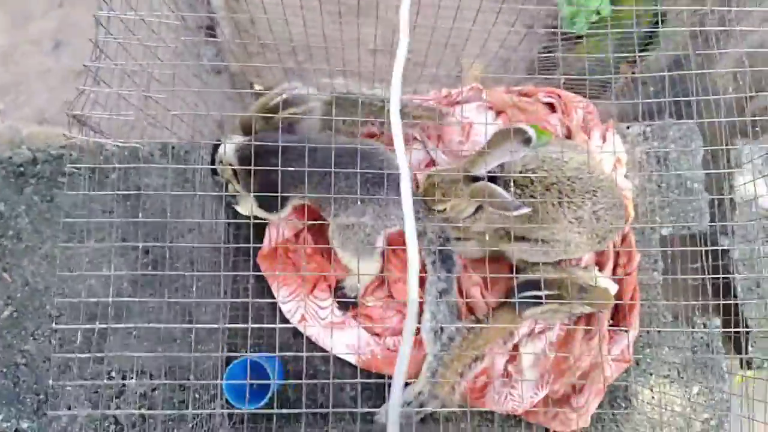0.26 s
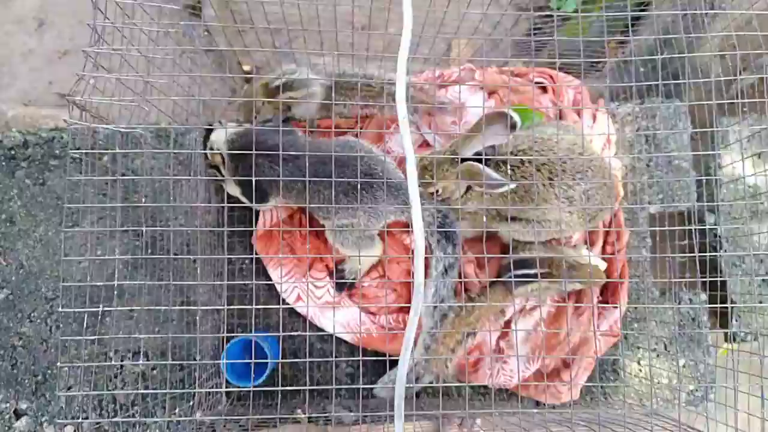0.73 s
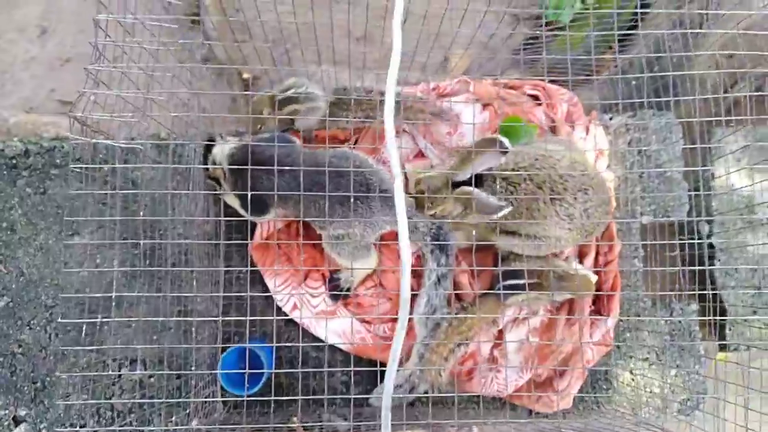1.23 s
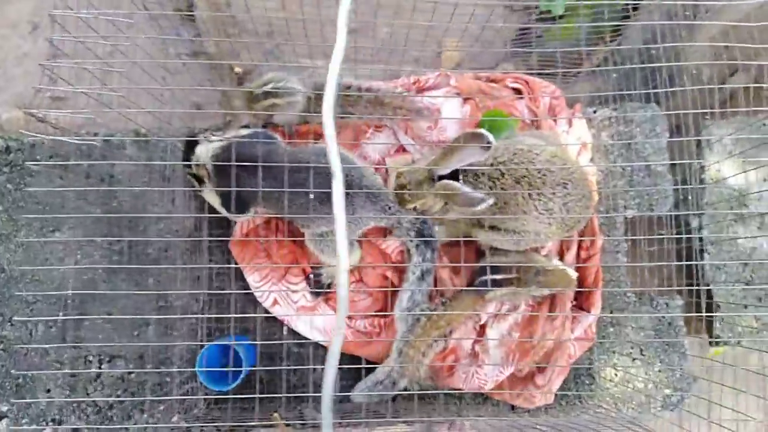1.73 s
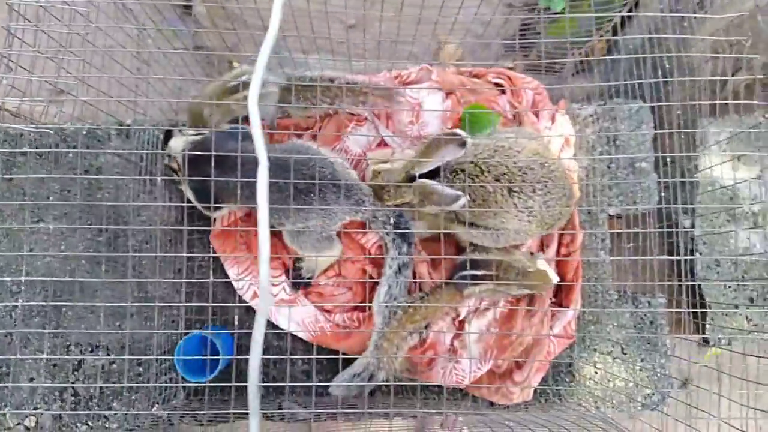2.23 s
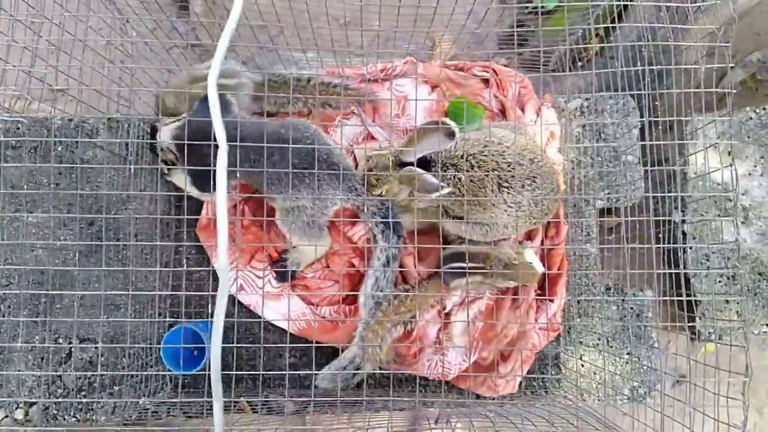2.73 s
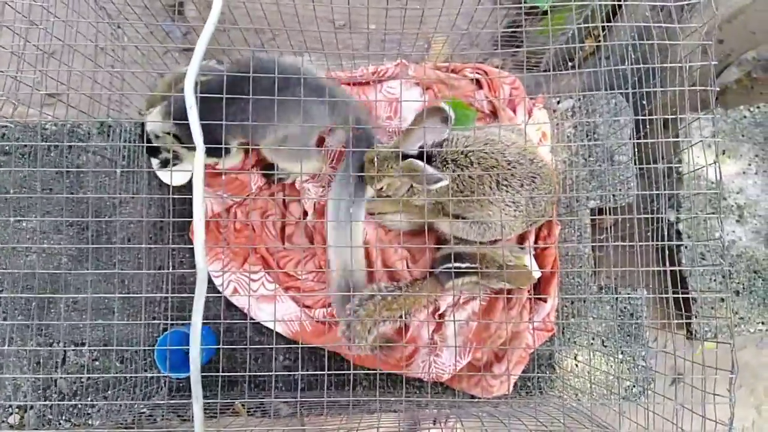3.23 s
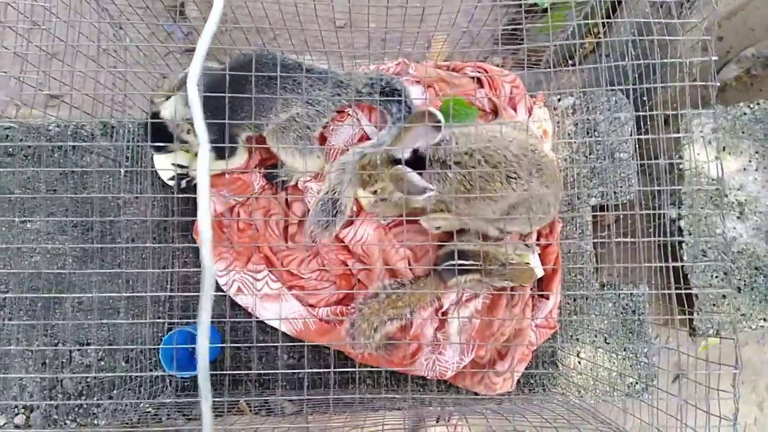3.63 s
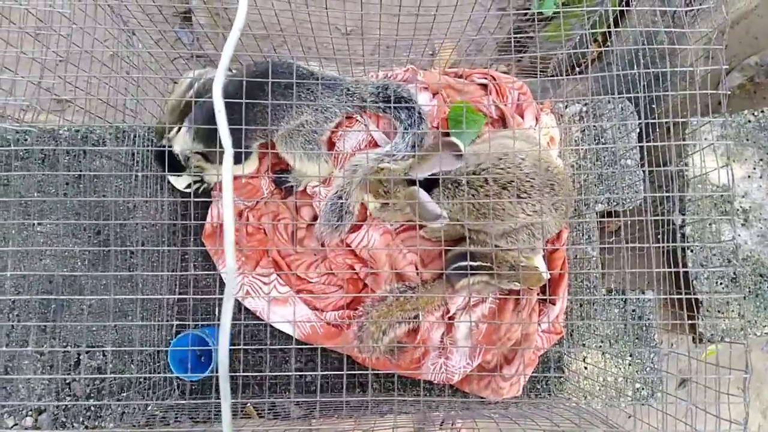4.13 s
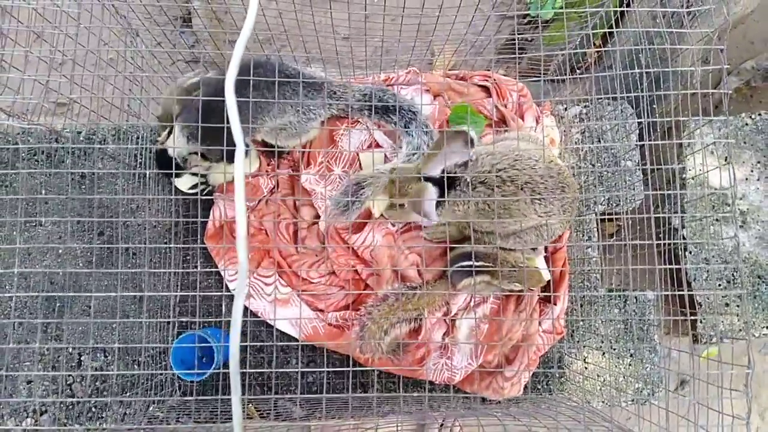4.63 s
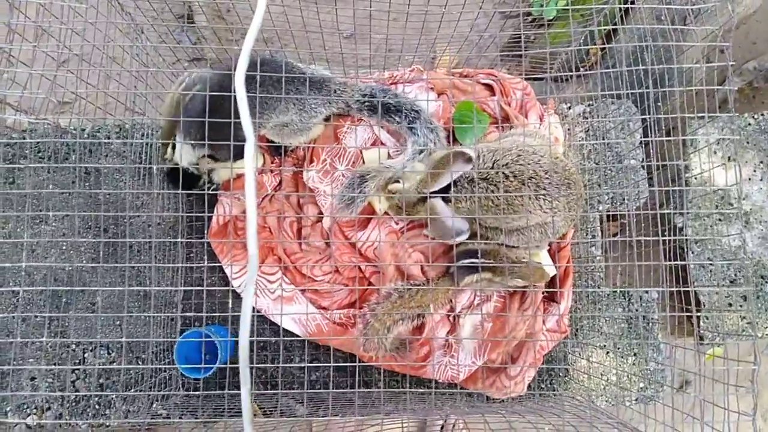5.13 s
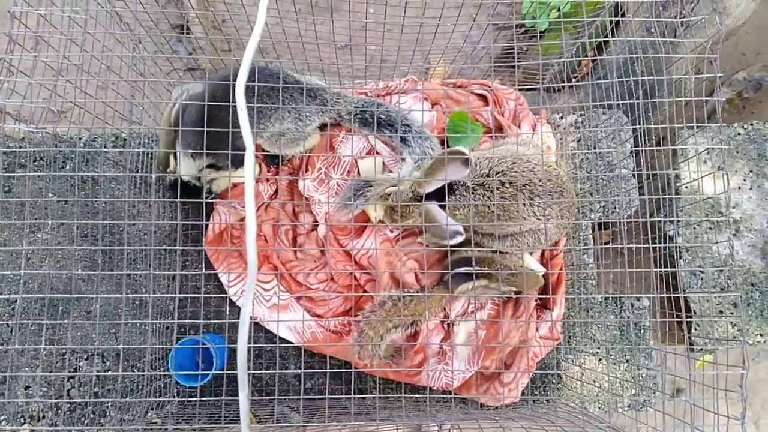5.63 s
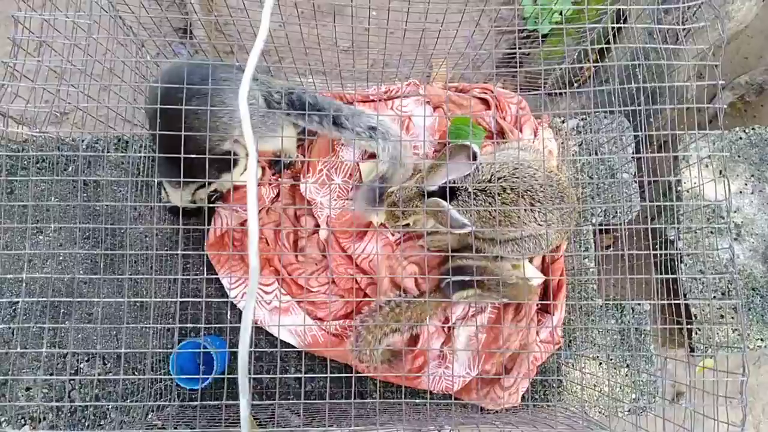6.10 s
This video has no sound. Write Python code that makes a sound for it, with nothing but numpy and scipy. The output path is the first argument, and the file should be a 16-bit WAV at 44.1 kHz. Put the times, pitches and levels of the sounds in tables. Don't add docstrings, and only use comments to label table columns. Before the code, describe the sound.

In a quiet yard by day, a hand taps and rubs the microphone case with low hollow thuds and a swish. A nearby bird then gives a rapid buzzy whistle phrase around one second. Claws tick sparsely on a wire hutch, a dove purrs low in the middle, and thin bird chips follow. Insects drone faintly over deep distant traffic. A bright burst of claw scratching on mesh closes it. Close, stereo, noise-reduced pickup.

```python
import sys
import numpy as np
from scipy import signal
from scipy.fft import rfft, irfft, next_fast_len
from scipy.io import wavfile
from scipy.ndimage import uniform_filter1d, map_coordinates

SR = 44100
rng = np.random.default_rng(int(sys.argv[2]) if len(sys.argv) > 2 else 0)


def put_to_file(sound):
    columns = np.atleast_2d(sound).T
    safe = np.clip(columns, -1, 1)
    whole_steps = np.round(safe * 32767)
    wavfile.write(sys.argv[1], SR, whole_steps.astype(np.int16))


def ratio(d):
    e = np.asarray(d, float) / 20
    return 10 ** e


N = 280476


def rms_one(x):
    return x / np.sqrt(np.mean(x ** 2) + 1e-20)


def in_time(rows):
    return np.interp(np.arange(N) / SR, *np.transpose(rows))


def at_hz(points, hz):
    points = np.array(points)
    return np.interp(np.log(hz + 1), np.log(points[:, 0]), points[:, 1])


def soft(db):
    return uniform_filter1d(ratio(db), size=130)


def sides(pan_db):
    left = ratio(np.asarray(pan_db) + np.zeros(N))
    return 2 * np.array([left, np.ones(N)]) / np.sqrt(1 + left ** 2)


def drift(rate):
    r = np.exp(-40 * np.pi * rate / SR)
    slow = signal.lfilter([1], [1, -2 * r, r * r], rng.standard_normal(N // 20 + 2002))[2000:]
    return np.interp(np.arange(N) / 20, np.arange(len(slow)), rms_one(slow))


def band(x, low_hz, high_hz, order=2):
    return signal.sosfilt(signal.butter(order, [low_hz, high_hz], "band", fs=SR, output="sos"), x)


def coloured(spectrum, patchy_db, alike=0., grain_db=0., patch_hz=460, frames=12):
    grain = grain_db * np.minimum(rng.exponential(1, N), 4)
    a, b = rng.standard_normal((2, N)) * ratio(grain)
    pair = np.array([a, alike * a + np.sqrt(1 - alike ** 2) * b], np.float32)
    hz, t, cells = signal.stft(pair, SR, nperseg=512)
    first, second = rng.standard_normal((2, 200, len(t) // 4 + 2))
    where = np.meshgrid(hz / patch_hz, np.arange(len(t)) / frames, indexing="ij")
    knots = (first, alike * first + (1 - alike) * second)
    patches = np.array([map_coordinates(k, where, order=1) for k in knots])
    cells = cells * ratio(patchy_db * patches).astype(np.float32)
    pair = signal.istft(cells, SR, nperseg=512)[1][:, :N]
    size = next_fast_len(N)
    colour = ratio(at_hz(spectrum, np.arange(size // 2 + 1) * SR / size))
    return rms_one(irfft(rfft(pair, size) * colour, size)[:, :N])


def swells(rows, rise, fall):
    t, rows = np.arange(0, N, 16) / SR, np.array(rows, float)
    since = t - rows[:, :1]
    db = rows[:, 2:3] + rise * np.minimum(since, 0) - fall * np.maximum(since - rows[:, 1:2], 0)
    row = rows[db.argmax(axis=0)].T
    progress = np.clip((t - row[0]) / row[1], 0, 1)
    db, u, *row = np.repeat([db.max(axis=0), progress, *row], 16, axis=1)[:, :N]
    return db, u, row


def ring(peak_db, hz, t60, puff, rise_s=0.):
    noise = band(rng.standard_normal(500 + round(t60 * SR)), hz * .72, hz * 1.35)
    noise = rms_one(noise[500:])
    t = np.arange(len(noise)) / SR
    rise = 1 - np.exp(-t / (rise_s + .5 / hz))
    tone = np.sin(2 * np.pi * hz * t)
    return ratio(peak_db - 60 * t / t60) * rise * ((1 - puff) * tone + puff * noise)


def add(out, s, sound, pan_db, lag=11):
    for side, gain, late in ((0, ratio(pan_db), lag), (1, 0.98, 0)):
        i = round(s * SR) + int(late)
        out[side, i:i + len(sound)] += 2 * gain / (1 + ratio(pan_db)) * sound[:N - i]


YARD_T60_S, YARD_DB = 0.66, -12.5


def yard(x):
    t = np.arange(round(YARD_T60_S * SR)) / SR
    tail = band(rng.standard_normal((2, SR)), 330, 11000, order=1)[:, :len(t)]
    tail = tail * ratio(-60 * t / YARD_T60_S) * (t > .012)
    return signal.fftconvolve(x, tail / np.sqrt(np.sum(tail ** 2) / 2), axes=1)[:, :N]


# (pitch [Hz], level [dB per Hz])
RUMBLE = [(20, -36), (32, -36), (45, -31), (56, -15), (64, 0), (73, -6), (100, -7), (125, -9), (150, -21),
          (190, -34), (260, -50), (400, -90)]
# (time [s], level [dB])
TRAFFIC = [(0.0, -45.5), (1.54, -47), (2.53, -51.5), (4.14, -46.5), (4.3, -50), (6.27, -48), (6.36, -56)]


def traffic():
    rumble = coloured(RUMBLE, 2.5, alike=0.93)
    return ratio(in_time(TRAFFIC)) * rumble * sides(np.linspace(.3, -4, N)) / np.sqrt(2)


# (pitch [Hz], level [dB per band line])
NOISE_PRINT = [(100, -90), (200, -84), (400, -88), (1000, -92), (2500, -91), (3500, -85), (5500, -79),
               (6300, -82), (7000, -86), (8000, -88), (9500, -92), (10500, -91), (12000, -95), (14500, -99)]


def murmur():
    return ratio(-64.5) * coloured(NOISE_PRINT, 5, patch_hz=200, frames=10)


# (low [Hz], high [Hz], left-right at start [dB], left-right at end [dB], flicker [dB])
CHORUS = [
    (3600, 4900, 6.5, 9.5, 4),
    (4520, 5800, 9.5, 9, -1.5),
    (6616, 7180, 4, -6.5, 3.5),
    (9086, 9650, 7.5, 21.5, 5.5),
    (7810, 8600, 6.5, -9.5, 6.5),
]
# (rise [dB/s], fall [dB/s])
SWELL = [(22.6, 20), (101, 60), (30, 2), (60, 91), (402, 408.5)]
# (time at full voice [s], hold [s], level [dB])
DRUMMER = [(0.755, 2.13, -63.5), (3.999, 1.5, -69), (5.596, 0.077, -63.5), (6.055, .4, -59)]
CICADA = [(.36, .68, -53), (1.15, .45, -57.5), (1.65, .32, -54), (2.581, 1.02, -55.5), (3.75, .28, -60.5),
          (4.46, .26, -55), (5.1, .15, -60), (5.28, .42, -53), (5.8, .12, -62.5), (6.15, .2, -60)]
CRICKET = [(0.01, 0.309, -56.5)]
KATYDID = [(.12, 0.5, -68), (1.08, 0.16, -67), (1.5, 0.37, -75), (2.0, 0.55, -80.5), (2.499, 0.83, -76),
           (3.4, 0.29, -69), (3.85, .5, -88), (4.499, 0.35, -70), (5.1, 0.25, -79), (5.5, 0.84, -86.5),
           (6.201, 0.27, -73)]
HOPPER = [(.93, 0.12, -74), (1.28, 0.063, -77), (1.841, 0.023, -82), (2.279, 0.1, -75), (2.52, 0.035, -86),
          (2.73, 0.033, -85), (3.08, 0.042, -76), (4.051, 0.05, -81), (4.39, .04, -81), (5.63, 0.035, -74)]


def insects():
    out, clicks = 0, coloured([(100, 0), (20000, 0)], 2.5, grain_db=1.5)
    phrases = (DRUMMER, CICADA, CRICKET, KATYDID, HOPPER)
    for rows, rates, chorus in zip(phrases, SWELL, CHORUS):
        low_hz, high_hz, start_db, end_db, flicker_db = chorus
        db = swells(rows, *rates)[0]
        song = rms_one(band(clicks, low_hz, high_hz, order=5 if low_hz > 4000 else 2))
        flicker = ratio(flicker_db * np.array([drift(13.4), drift(30)]))
        out = out + ratio(db) * song * flicker * sides(np.linspace(start_db, end_db, N))
    return out


# (time [s], hold [s], level [dB], top [Hz], end [Hz])
DOVE = [
    (1.12, 0.49, -75, 690, 664),
    (1.72, 0.22, -69.5, 833, 824),
    (1.92, 0.12, -65.5, 644, 620),
    (2.1, 0.16, -77.5, 860, 855),
    (2.39, .9, -61, 674, 634),
    (3.54, 0.62, -59, 723.4, 630.6),
    (5.72, 0.46, -77, 700, 620),
]
PURR_PER_S = 70.5
COO_DB_PER_S, COO_ARCH_DB = 297.5, 5
SCOOP_S, SCOOP_SHARE = 0.055, .12


def doves():
    db, u, (_, hold, _, top_hz, end_hz) = swells(DOVE, COO_DB_PER_S, COO_DB_PER_S)
    db = db - COO_ARCH_DB * (2 * u - 1) ** 2
    scoop = 1 - SCOOP_SHARE * np.exp(-u * hold / SCOOP_S)
    throat_hz = (top_hz + u * (end_hz - top_hz)) * scoop
    throb = np.exp(np.cos(2 * np.pi * np.cumsum(PURR_PER_S * (1 + .03 * drift(3))) / SR))
    rough = signal.sosfilt(signal.butter(4, 62, fs=SR, output="sos"), rng.standard_normal((2, N)))
    turn = 2 * np.pi * np.cumsum(throat_hz) / SR
    voice = (0.75 + rms_one(rough[0])) * np.cos(turn) + rms_one(rough[1]) * np.sin(turn)
    dry = soft(db) * rms_one(voice * (2.2 + throb)) * np.ones((2, 1))
    return dry + ratio(-12) * yard(dry)


NOTE_RISE_DB_PER_S, NOTE_FALL_DB_PER_S = 3497, 1796.5
STEADY_PER_GLIDE = 1
GLIDE_BEND = 0.55
RASP, RASP_HZ, OCTAVE = 0.18, 834, 0.041


def whistles(notes, steady, wobble, cycles, rise=NOTE_RISE_DB_PER_S, rasp=RASP):
    db, u, (s, _, _, start_hz, end_hz) = swells(notes, rise, NOTE_FALL_DB_PER_S)
    beat = np.pi * np.cumsum((start_hz + end_hz) / cycles * (1 + wobble * drift(33))) / SR
    beat = beat - beat[(s * SR).astype(int)]
    steady = steady + STEADY_PER_GLIDE * np.abs(end_hz / start_hz - 1)
    buzz = (steady + np.cos(beat)) / np.sqrt(steady ** 2 + .5)
    bend = 1 + wobble * np.sin(beat) + 0.33 * wobble * drift(140)
    glide_hz = start_hz + u ** GLIDE_BEND * (end_hz - start_hz)
    turn = 2 * np.pi * np.cumsum(glide_hz * bend) / SR
    breath = 1 + rasp * rms_one(band(rng.standard_normal(N), 60, RASP_HZ))
    tone = (np.sin(turn) + OCTAVE * np.sin(2 * turn)) * breath
    return uniform_filter1d(ratio(db + 8.0), size=90) * buzz * tone


# (time [s], length [s], start [Hz], end [Hz], peak [dB])
CHIP = [
    (3.74, 0.0035, 4346, 2830, -41),
    (4.393, 0.017, 5310, 4520, -45),
    (4.491, 0.028, 4856, 5820, -34),
    (4.507, 0.025, 5620, 4360, -38),
    (5.31, 0.0053, 3990, 3420, -48.5),
    (5.401, 0.015, 4960, 3180, -38),
]


def chips():
    out = np.zeros((2, N))
    for s, length, start_hz, end_hz, peak_db in CHIP:
        u = np.linspace(0, 1, round(length * SR))
        turn = 2 * np.pi * np.cumsum(start_hz + u ** 0.725 * (end_hz - start_hz)) / SR
        tone = np.sin(turn) + 0.066 * np.sin(2 * turn)
        add(out, s, ratio(peak_db) * np.sin(np.pi * u) ** 0.81 * tone, 1.5)
    return out


# (time [s], hold [s], level [dB], start [Hz], end [Hz])
WHISTLE = [
    (1.1385, 0.011, -34, 2680, 2660),
    (1.149, 0.0037, -34.5, 2736, 2620),
    (1.172, 0.014, -52, 2504, 2700),
    (3.388, 0.015, -64, 2590, 2530),
    (3.428, 0.032, -64.5, 2390, 2305),
]
GLIDE = [
    (1.064, 0.0098, -44.5, 2178, 1860),
    (1.089, 0.0045, -42.5, 1960, 1934),
    (1.097, 0.025, -44.5, 2430, 3040),
]
TRILL = [
    (.7975, .017, -37.5, 2854, 2724),
    (.832, .018, -47.5, 2690, 3000),
]
UPPER = [
    (.984, 0.0074, -56.5, 1960, 2077),
    (.997, 0.024, -46, 2150, 2135),
    (1.03, 0.046, -57.5, 2150, 2143),
]
LOWER = [
    (.997, .028, -49, 1910, 1915),
    (1.027, 0.023, -53.5, 1814, 1762),
]
STEADY, SPLIT_STEADY = 1.2, 28.7
CYCLES_PER_BUZZ, QUICK_CYCLES_PER_BUZZ, TRILL_RISE_DB_PER_S = 16, 10, 1047


def birds():
    out = chips()
    buzzy = whistles(WHISTLE, STEADY, 0.04, CYCLES_PER_BUZZ)
    buzzy += whistles(GLIDE, 1.6 * STEADY, .012, QUICK_CYCLES_PER_BUZZ)
    buzzy += whistles(TRILL, STEADY, 0.018, QUICK_CYCLES_PER_BUZZ, TRILL_RISE_DB_PER_S)
    split = sum(whistles(voice, SPLIT_STEADY, 0.0022, CYCLES_PER_BUZZ, rasp=0.04) for voice in (UPPER, LOWER))
    add(out, 0, buzzy + split, 11)
    return out + ratio(YARD_DB) * yard(out)


# (time [s], hold [s], dull level [dB], bright level [dB])
STIR = [(2.58, 0.085, -69.5, -92), (3.35, 0.013, -100, -74), (3.53, 0.016, -72, -79.5),
        (4.667, 0.064, -81, -80), (5.759, 0.059, -74, -75), (5.976, .03, -86, -73), (6.08, 0.029, -98, -56),
        (6.184, 0.035, -86, -59.5), (6.26, 0.0082, -82, -57), (6.314, 0.014, -93, -50.5)]
# (time [s], hold [s], level [dB])
BURST = [
    (6.07, 0.074, -58.5),
    (6.15, .08, -60.5),
    (6.31, 0.021, -48.5),
]
# (pitch [Hz], level [dB per Hz])
STIR_DULL = [(500, -52), (850, 6), (1020, 4), (1500, 5), (2200, 0), (3000, -35), (5000, -77)]
STIR_BRIGHT = [(3240, -31.5), (5500, -3.5), (8860, -4), (9960, -53), (10100, -33), (10800, -20),
               (11900, -23.5), (14400, -41.5)]
SCRAMBLE = [(650, -75), (1100, -32), (1300, -16), (1500, -8), (2050, -9), (2500, 13), (6500, 3.5),
            (8450, -51), (14300, -120)]
STIR_DB_PER_S = 184
BURST_RISE_DB_PER_S, BURST_FALL_DB_PER_S = 127, 188


def paws():
    dull = swells([r[:3] for r in STIR], 2.3 * STIR_DB_PER_S, STIR_DB_PER_S)[0]
    bright = swells([(s, hold, db) for s, hold, _, db in STIR], STIR_DB_PER_S, STIR_DB_PER_S)[0]
    scramble = swells(BURST, BURST_RISE_DB_PER_S, BURST_FALL_DB_PER_S)[0]
    out = soft(dull + .8) * coloured(STIR_DULL, 6, grain_db=2, patch_hz=160, frames=8) * sides(6)
    out += soft(bright + 4) * coloured(STIR_BRIGHT, 3.5, grain_db=3) * sides(-3)
    out += soft(scramble + 4) * coloured(SCRAMBLE, 1.8, grain_db=3.0) * sides(9.6)
    return out


# (time [s], hold [s], level [dB])
RUB = [
    (.31, 0.18, -52.5),
    (0.0081, .2, -73),
    (1.686, 0.22, -70.5),
]
# (time [s], hold [s], level [dB])
SWISH = [
    (0.0081, .2, -67),
    (.25, 0.055, -61.5),
    (.36, 0.12, -49.5),
    (.52, 0.17, -57.5),
]
# (pitch [Hz], level [dB per Hz])
RUB_DULL = [(40, -25.5), (82, 9), (140, -4), (205, 5), (482, -8), (634, -10.5), (776, -7), (1370, -26.5),
            (2400, -33), (3120, -56), (5280, -120)]
RUB_BRIGHT = [(1290, -19.5), (2200, -16.5), (2840, -11.5), (4020, -13), (5780, -4), (7040, -3.5),
              (9550, -16), (11500, -27), (12500, -41), (16200, -52), (22000, -120)]
RUB_RISE_DB_PER_S, DULL_FALL_DB_PER_S, BRIGHT_FALL_DB_PER_S = 79, 28.5, 190.5


def rubbing_hand():
    dull = swells(RUB, RUB_RISE_DB_PER_S, DULL_FALL_DB_PER_S)[0]
    bright = swells(SWISH, RUB_RISE_DB_PER_S, BRIGHT_FALL_DB_PER_S)[0]
    out = soft(dull + 3) * coloured(RUB_DULL, 2.5, grain_db=1.5) * sides(11)
    out += soft(bright + 7) * coloured(RUB_BRIGHT, 2.6, grain_db=2.0) * sides(23.0)
    return out


# (time [s], peak [dB], ring [Hz], left-right [dB])
TAP = [(4.6884, -59, 1050, 5), (4.7134, -59.5, 1270, 22), (4.838, -58.5, 540, 8), (4.854, -61, 1070, 12),
       (6, -59, 586, 16), (5.31, -57, 576, 14), (5.096, -70.5, 1050, 8), (4.43, -66, 450, 7),
       (2.7, -62, 420, 5), (2.1, -57, 410, 3), (2.3, -58.5, 350, 2.5), (5.18, -60, 430, 9),
       (5.93, -62.5, 900, 6), (6.324, -31.5, 7200, 7)]


def taps(out):
    for s, db, hz, pan_db in TAP:
        add(out, s, ring(db, hz, 0.091, puff=0.11, rise_s=0.0012), pan_db)


# (time [s], peak [dB], centre
# [Hz], left-right [dB])
SNAP = [(0.814, -39, 4300, 10.5), (1.141, -34, 3050, 8.5), (1.16, -42.5, 3200, 5.5), (.856, -51, 3400, 7.5),
        (.876, -48, 3200, 15), (1.144, -50.5, 3070, 9.5), (1.15, -42, 2990, 8.5), (3.484, -41, 1300, 4),
        (6.328, -33, 6500, -6), (3.4865, -44, 8800, 5), (3.4924, -31.5, 8800, -5), (3.483, -43.5, 900, 3),
        (3.4915, -41, 4200, 5), (3.494, -33, 6600, 15), (3.5, -40, 8800, 0), (3.507, -46, 6500, -9),
        (4.599, -41, 6000, 4), (4.598, -52, 9000, 1), (4.6994, -42, 5200, 7), (4.87, -53, 9500, -0.5),
        (0.824, -45.5, 4450, 14.5), (2.0665, -48.5, 6660, 0), (4.221, -57.5, 1370, -4),
        (4.299, -60.5, 2270, -24), (5.0933, -63, 1710, -8), (5.7976, -44.5, 6800, 1),
        (5.996, -44, 6900, -8), (6.0237, -43, 6000, -4)]


def snaps(out, rows=SNAP):
    for s, db, hz, pan_db in rows:
        add(out, s, ring(db, hz, .018, puff=1), pan_db)


# (time [s], peak [dB], ring
# [Hz], left-right [dB])
TICK = [(1.3243, -36, 3540, -3), (1.7837, -35, 3720, 4), (1.8482, -37.5, 3650, 2),
        (2.0901, -33.5, 4340, -7), (2.29, -36.5, 3434, 2), (2.4843, -42.5, 4030, -4), (2.701, -38, 4160, 9),
        (2.772, -49.5, 4100, -13), (2.904, -41.5, 4290, 2), (3.483, -32, 3710, 8), (4.2967, -43, 4140, -1),
        (4.698, -36.5, 3730, 3), (5.1505, -37.5, 3600, 0), (5.157, -48.5, 3470, 11),
        (5.7994, -41.5, 4230, 17), (6.0263, -56, 4170, 10), (6.0462, -47, 3870, 1), (6.0712, -34, 3530, 6),
        (6.0868, -21.5, 3900, 5), (6.091, -33, 4300, 10), (6.095, -31, 3500, 6), (6.102, -33, 3270, 1),
        (6.3195, -25, 3300, 15), (6.325, -30, 3700, 9), (6.2892, -31, 3340, 7), (6.329, -19, 3500, 17.5)]
# (time [s], peak [dB], ring [Hz], left-right [dB])
SCRATCH = [(2.5565, -38.5, 4180, 3), (3.3388, -42, 4050, 1), (3.4892, -29, 3800, -18),
           (3.4983, -29.5, 3600, 31), (4.596, -47, 4050, -9), (4.936, -41.5, 3600, 4),
           (5.094, -39, 4050, 0), (5.9925, -61, 2610, 14), (6.0779, -29, 3170, 3), (6.303, -30, 3400, -5)]
TICK_TREBLE_DB, SCRATCH_TREBLE_DB = -25.5, -17


def claws(out):
    rows = [(*r, TICK_TREBLE_DB) for r in TICK] + [(*r, SCRATCH_TREBLE_DB) for r in SCRATCH]
    for s, db, hz, pan_db, treble_db in rows:
        t60, rise_s = (.04, .003) if db < -36 else (.022, .0002)
        add(out, s - .001, ring(db - 1.5, hz, t60, puff=0.44, rise_s=rise_s), pan_db)
        add(out, s, ring(db + treble_db, 8500, .05, puff=1, rise_s=.001), pan_db - 2)
        add(out, s, ring(min(db, -36) - 13, 4800, .12, puff=1, rise_s=.003), pan_db - 6)


# (time [s], peak [dB], ring [Hz], left-right [dB])
KNOCK = [(0.689, -30, 163, 31), (0.789, -32, 151, 24), (1.295, -31.5, 217, 18), (1.684, -31, 141, 23),
         (1.912, -28.5, 134, 22), (3.483, -30.5, 640, 5), (3.4876, -31, 470, -1), (4.103, -38, 165, 25),
         (5.399, -46, 170, 16), (5.421, -50, 202, 4)]


def knocks(out, rows=KNOCK):
    for s, db, hz, pan_db in rows:
        add(out, s, ring(db, hz, 0.027, puff=0.51), pan_db)
        add(out, s, ring(db - 11.5, hz * 1.82, 0.051, puff=0.48), pan_db)


# (time [s], peak [dB], ring [Hz])
FINGER = [
    (.097, -21.5, 137),
    (0.118, -31, 177),
    (0.18, -20, 160),
    (0.2406, -19.5, 169),
    (.292, -27.5, 197),
    (0.308, -47, 170),
    (.427, -33.5, 174),
]
NAIL_HZ = [1950, 2720, 6900]
NAIL_S, NAIL_DB, FINGER_PAN_DB = 0.0017, -21, 9
SLIP_S, SLIP_DB, SLIP_HZ = 0.0041, -17.5, 7150


def fingers(out):
    pads = [(*r, FINGER_PAN_DB) for r in FINGER]
    knocks(out, pads)
    for s, db, hz, pan_db in pads:
        add(out, s, ring(db - 15.0, hz * 3.37, 0.039, puff=0.34), pan_db)
        add(out, s + SLIP_S, ring(db + SLIP_DB, SLIP_HZ, 0.21, puff=0.4, rise_s=0.0013), pan_db)
    snaps(out, [(s + NAIL_S, db + NAIL_DB, hz, FINGER_PAN_DB + 7.5) for s, db, _ in FINGER for hz in NAIL_HZ])


def contacts():
    out = np.zeros((2, N))
    for touch in (taps, snaps, claws, knocks, fingers):
        touch(out)
    out = signal.sosfilt(signal.butter(2, 11000, fs=SR, output="sos"), out)
    return out + ratio(YARD_DB - 3.5) * yard(out)


def scene():
    background = traffic() + murmur() + insects()
    return background + doves() + birds() + paws() + rubbing_hand() + contacts()


def noise_remover(x):
    hz, t, cells = signal.stft(x.astype(np.float32), SR, nperseg=1024, noverlap=768)
    power = uniform_filter1d(np.abs(cells) ** 2, size=5, axis=1)
    power = uniform_filter1d(power, size=5)
    power = np.maximum(power, signal.lfilter([.15], [1, -.85], power))
    learnt = ratio(2 * at_hz(NOISE_PRINT, hz)[:, None])
    kept = np.clip(2 - 2 * learnt / (power + 1e-20), ratio(-36), 1)
    return signal.istft(cells * kept, SR, nperseg=1024, noverlap=768)[1][:, :N]


def top_cut(x):
    return signal.sosfilt(signal.cheby2(10, 60, 15100, fs=SR, output="sos"), x)


# (pitch [Hz], level [dB])
WHINE = [(10998, -95), (11999, -103), (14002, -103)]


def circuit_whine():
    t = np.arange(N) / SR
    gate = np.interp(t, [3.55, 3.62, 4.45, 4.5], [0, 1, 1, 0])
    whine = sum(ratio(db + 5.5 + 5.4 * drift(21)) * np.sin(2 * np.pi * hz * t) for hz, db in WHINE)
    return gate * whine * ratio([[-12], [4]])


# (pitch [Hz], level [dB per Hz])
FLOOR = [(120, 0), (250, -6), (420, -4), (800, -11), (2500, -16), (4500, -26), (7500, -44), (9000, -40),
         (10000, -22), (11200, -32), (14300, -28), (14500, -70)]
FLOOR_DB = -79


def floor_hiss():
    return ratio(FLOOR_DB) * coloured(FLOOR, 10, alike=.7, patch_hz=115, frames=6)


def band_limit(x):
    return signal.sosfilt(signal.butter(12, 14600, fs=SR, output="sos"), x)


def record(dry):
    mix = top_cut(noise_remover(dry)) + floor_hiss() + circuit_whine()
    return band_limit(mix)


dry = scene()
out = record(dry)
put_to_file(out)
```